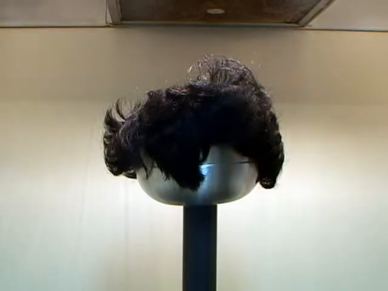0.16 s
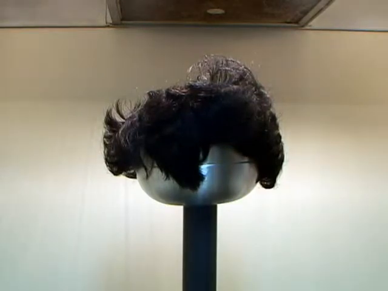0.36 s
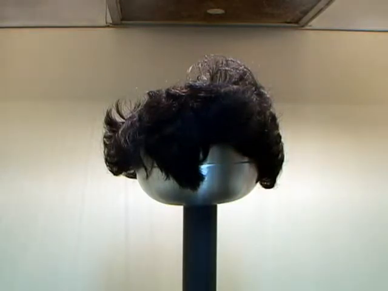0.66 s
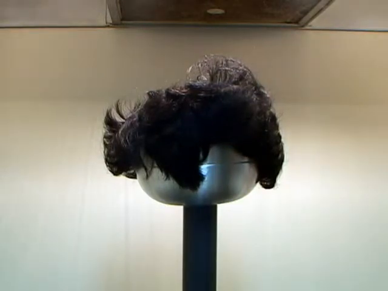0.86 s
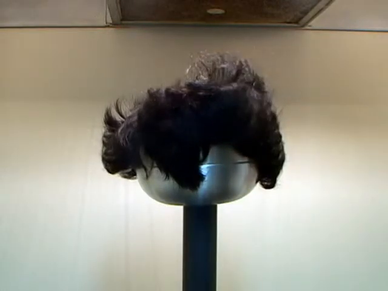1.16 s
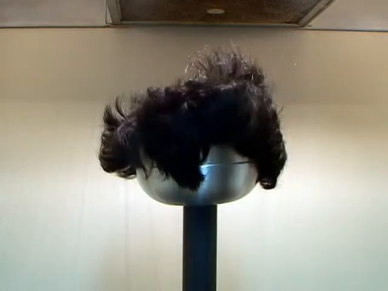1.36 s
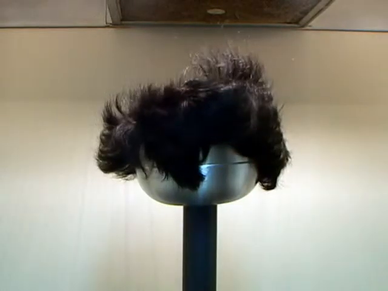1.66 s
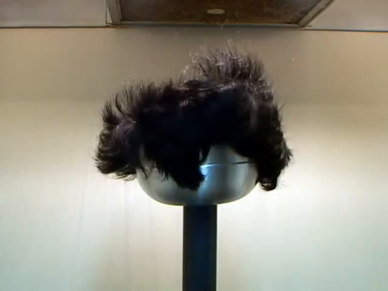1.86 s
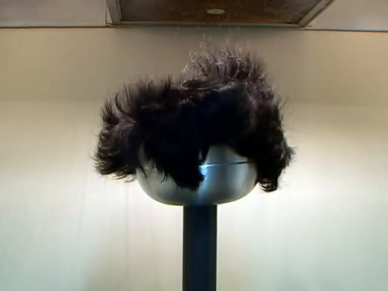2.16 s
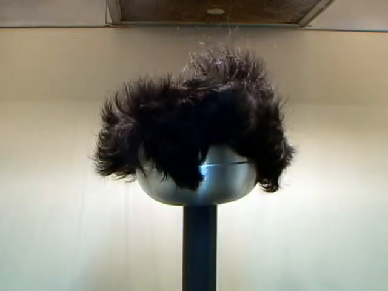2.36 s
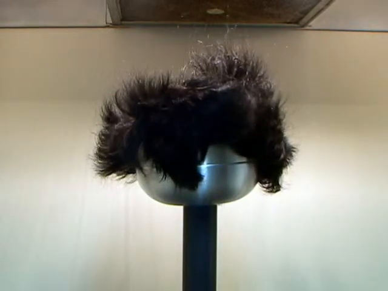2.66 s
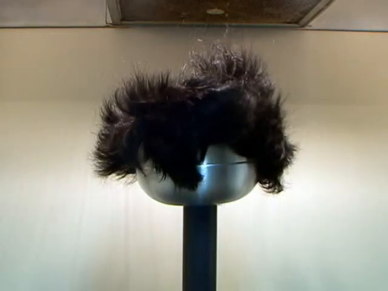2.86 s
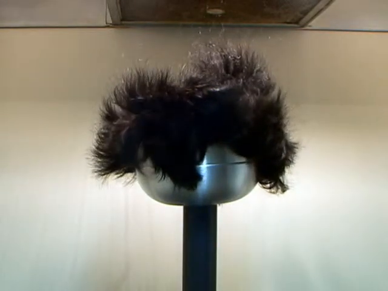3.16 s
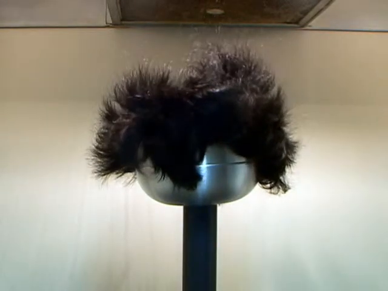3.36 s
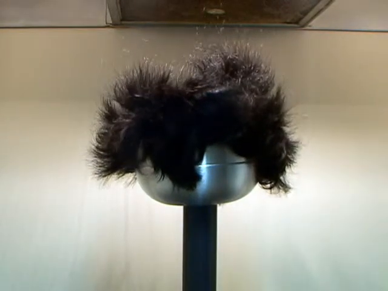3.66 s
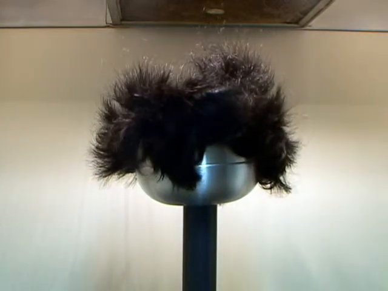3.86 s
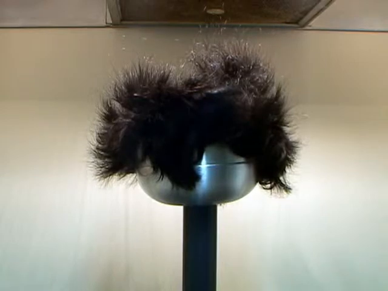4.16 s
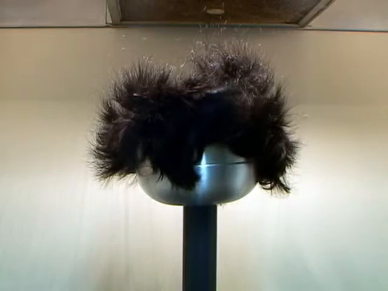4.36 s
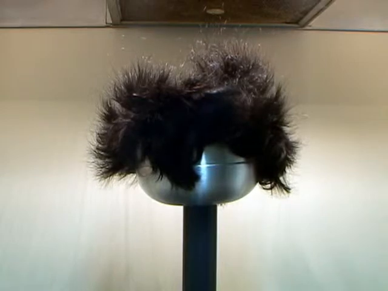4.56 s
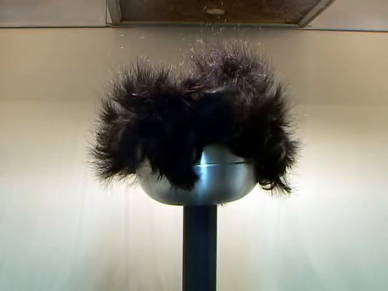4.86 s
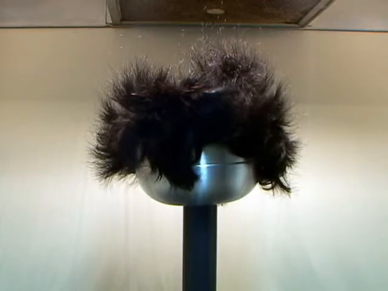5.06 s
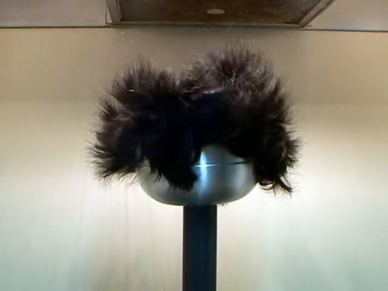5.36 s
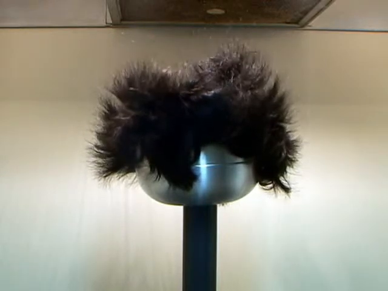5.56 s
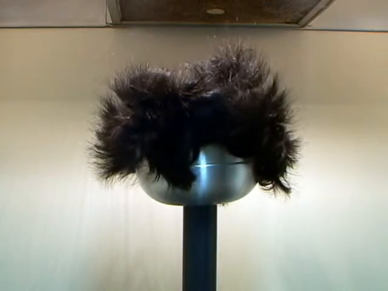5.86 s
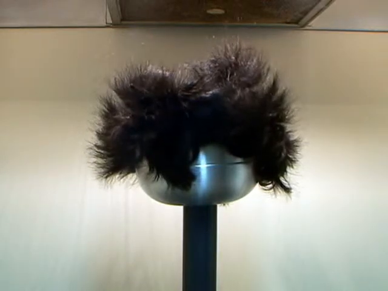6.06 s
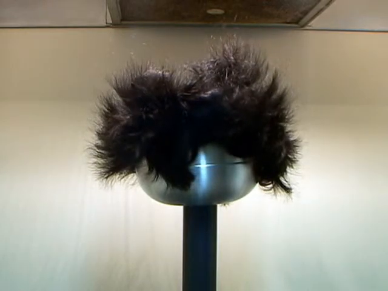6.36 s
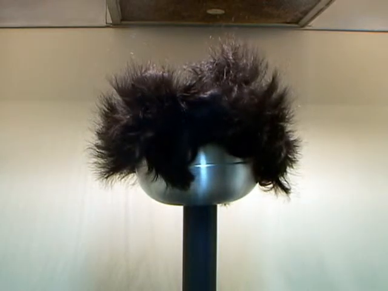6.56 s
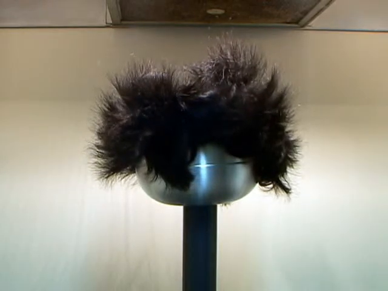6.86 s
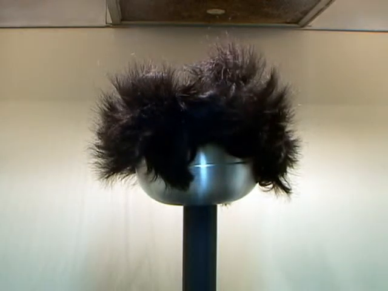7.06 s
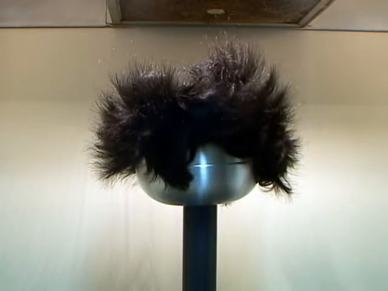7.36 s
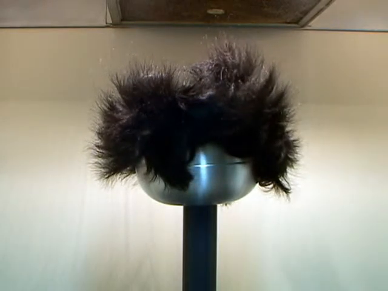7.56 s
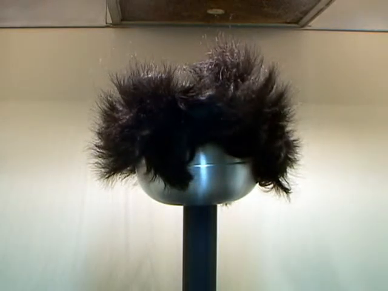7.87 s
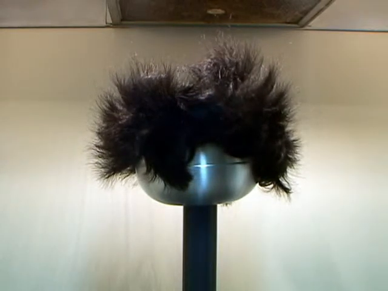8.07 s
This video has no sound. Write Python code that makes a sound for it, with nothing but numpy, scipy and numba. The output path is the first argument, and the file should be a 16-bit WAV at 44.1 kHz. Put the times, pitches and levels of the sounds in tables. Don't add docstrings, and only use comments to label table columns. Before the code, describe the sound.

A quiet, slightly hissy small room. A hand fumbles softly on a hollow base, then a switch snaps at about 0.7 seconds. A small electric motor knocks and spins up in a fraction of a second to a steady, nasal whine with buzzing brush rattle and a gentle belt pulsation. Later, faint high crackles from a charged metal dome join it. Close, plain microphone; the motor keeps running to the end.

```python
import sys
import numpy as np
from scipy import signal
from scipy.fft import rfft, irfft, next_fast_len
from scipy.io import wavfile
from numba import njit

SR = 44100
rng = np.random.default_rng(int(sys.argv[2]) if len(sys.argv) > 2 else 0)


def volts_from_db(level):
    exponent = np.asarray(level, float) / 20
    return 10 ** exponent


def transcribe(u):
    v = np.clip(np.atleast_2d(u).T, -1, 1)
    q = np.round(v * 32767).astype(np.int16)
    wavfile.write(sys.argv[1], SR, q)


N = 362943
T = np.arange(N) / SR
STEP = 64

# pitch_hz, level_db
ROOM_TONE = [(15, -37), (25, 2), (96, -8), (152, 3), (227, -5.5), (552, -11.5), (970, -18), (1750, -26),
             (1950, -25.5), (5280, -28), (15500, -30)]
ROOM_TONE_DB = -52
# pitch_hz, level_db
TAPE_WHINE = [(150.7, -57), (570.6, -73), (1798, -74), (2466, -80), (3295, -77), (3898, -80), (4797, -77),
              (5093, -78), (5394, -78), (5696, -77), (5992, -83), (6293, -80), (6595, -78)]
# pitch_hz, side_minus_centre_db
ROOM_WIDTH = [(60, -1), (110, -12), (200, -4), (380, -4), (700, -4), (1290, -6), (2380, -10), (4400, -7.5),
              (9500, -13.5), (15000, -32)]

# start_s, peak_db, bright_share_db
FUMBLE = [(0.026, -62, -14), (0.126, -43.5, -6), (0.145, -45, -18), (0.179, -47, -15), (0.237, -44.5, -25),
          (0.328, -55, -19.5), (0.357, -56, -15.5), (0.397, -46, -10), (0.447, -39, -20), (0.478, -50, -21),
          (0.517, -43.5, -16), (0.549, -49, -13), (0.601, -49, -18), (0.634, -44, -22)]
# pitch_hz, level_db, fade_60db_s
BASE_DULL = [(560, -2, 0.028), (700, 2, 0.023), (875, 2.5, 0.012), (1100, -3, 0.014), (1300, -2, 0.015),
             (1600, -2, 0.01)]
# pitch_hz, level_db, fade_60db_s
BASE_BRIGHT = [(2500, 1, .02), (2880, -1, 0.014), (3600, -5, .015)]
TOUCH_S = 0.035

# start_s, peak_db
PRESS = [
    (.668, -41),
    (.679, -39),
    (.686, -37),
    (.704, -30),
    (.718, -33),
]
# pitch_hz, level_db, fade_60db_s
PRESS_MODES = [(108, -7, 0.08), (194, -3.5, 0.11), (418, -3.5, 0.056), (682, -1.5, 0.057), (850, -5, 0.043),
               (1920, -4, 0.016)]

# start_s, peak_db
SWITCH = [
    (.7025, -34),
    (.7032, -31),
    (.7041, -33),
    (.7052, -36),
    (.709, -39),
    (.7185, -44),
]
# pitch_hz, level_db, fade_60db_s
SWITCH_MODES = [(1250, 0, .012), (1600, -7, .01), (2400, -12, .005), (3500, -2, .008), (4200, -11, .004),
                (5600, -14, .004), (8500, -18, .003)]
# low_hz, high_hz, level_db, decay_s
PUFFS = [
    (2800, 4200, -35, 0.0085),
    (4500, 12500, -51, 0.004),
]

# time_s, turns_per_s
SPIN_UP = [
    (.70, 14),
    (.75, 25),
    (.85, 42),
    (.90, 49),
    (.95, 53.8),
    (1.0, 55.4),
    (1.15, 55.6),
]
FULL_SPEED = 55.3
SETTLE_DROP, SETTLE_S = .35, 1.1
BELT_HZ, BELT_SWING, BELT_CREST_S = 5.787, .18, .0836
ROLLER_HZ, ROLLER_SWING, ROLLER_CREST_S = 9.46, .07, .0803
LOAD_POWER = 2.53
JOLT_S, JOLT_WIDTH_S, JOLT_DB = .73, .012, 8.9
HUM_HZ, HUM_DB = 120, -54.5

# order, centre_db, side_db, swell_with_speed (-1 to 1)
STRONG_ORDERS = [(1, -47, -66, 0), (3, -53, -79, 0), (5, -56, -71, 0), (7, -30, -59, 0), (10, -42, -57, .1),
                 (11, -49, -53, .2), (12, -44, -47, -.1), (13, -44, -58, .6), (14, -44, -52, .4),
                 (15, -49, -65, 0), (18, -46, -54, -.2), (21, -45, -46, .6), (22, -37, -50, -.1),
                 (23, -38, -59, -.1), (24, -41, -60, -.1), (26, -43, -60, .1), (27, -46, -50, .6),
                 (28, -31, -47, -.05), (29, -43, -51, -.2), (30, -43, -65, .7), (33, -42, -56, -.5),
                 (34, -42, -71, .2), (35, -46, -57, -.2), (36, -45, -50, -.5), (38, -46, -54, -.3),
                 (39, -48, -51, .2), (40, -44, -55, -.2), (42, -50, -50, -.5), (20, -61, -62, .2),
                 (19, -50, -69, -.2)]
TOP_ORDER = 72
# pitch_hz, level_db
WEAK_CENTRE = [(110, -73), (220, -77), (340, -62), (440, -57.5), (1400, -54.5), (2500, -53.5),
               (3100, -59.5), (4000, -63)]
# pitch_hz, level_db
WEAK_SIDE = [(110, -78), (220, -73), (330, -63), (1000, -67), (2300, -60), (2700, -66), (3300, -82),
             (4000, -86)]
WEAK_SCATTER_DB, WEAK_SWELL = 1.5, .25
EARLY_DB_PER_SWELL = 7.0
# pitch_hz, level_db
EARLY_PANELS = [(400, -1), (530, -5), (620, -1), (830, 3.5), (950, -2), (1250, 2), (1500, 1), (1550, -3.5),
                (1650, -0.5)]
SWELL_GAIN = 1.3
PUSH_ANGLE = .36
PANEL_S, PANEL_WIDTH_S, PANEL_LIFT_DB, PANEL_REST_DB = 3, 1.5, 12, -7.5
WOBBLE_HZ, WOBBLE_DEPTH, WOBBLE_CREST_S = 1.466, .75, 1.5
SHIVER_HZ, SHIVER_DEPTH, SHIVER_CREST_S, SHIVER_S, SHIVER_WIDTH_S = 1.85, 1.05, 1.35, 1.45, .24

# angle_turns, level_db
CONTACTS = [
    (.0, 3),
    (.10, -12.5),
    (.28, -6),
    (.38, 0),
    (.51, -13),
    (.66, -12.5),
    (.79, -30),
]
# pitch_hz, level_db per Hz
RATTLE_COLOUR = [(60, -89), (200, -86), (330, -76.5), (470, -75), (950, -77.5), (1250, -72), (1600, -65.5),
                 (2100, -67.5), (2600, -73), (3100, -82.5), (5500, -82.5), (9500, -89), (12200, -98),
                 (13200, -110)]
# pitch_hz, width_hz, level_db
RATTLE_RINGS = [(3415, 47, 4.5), (3540, 67, 8), (4540, 400, -4), (5890, 210, -2.5), (7050, 440, 3),
                (7700, 350, 2), (8400, 83, 2), (9180, 130, 8), (9870, 130, 5.5)]

# pitch_hz, level_db, fade_60db_s
KNOCK_MODES = [(384, -15, 0.058), (777, -5, 0.047), (1260, -6, 0.04), (1537, 0, 0.034), (1980, -0.5, 0.026),
               (2250, -3, 0.017), (2820, -0.5, 0.0048)]
KNOCK_ANGLE, KNOCK_UNTIL_S = .76, .935
KNOCK_DB, KNOCK_GROWS_DB_PER_S, KNOCK_SPREAD_S = -28.5, 15, 0.00595
KNOCK_PUFF_DB = -14

# start_s, peak_db
SPARKS = [(3.811, -40), (5.4094, -36), (5.4468, -34), (5.5166, -37), (5.6787, -36), (5.7581, -30),
          (5.8548, -36), (5.9077, -32), (6.018, -35), (6.1512, -32), (6.4136, -34), (6.5263, -35),
          (6.687, -37), (6.7478, -36), (6.877, -39), (7.0182, -33), (7.0771, -40), (7.1334, -40),
          (7.1963, -36), (7.4632, -36), (7.767, -31), (7.9172, -39), (7.9451, -37), (8.1167, -34.5),
          (8.1736, -35), (8.206, -40)]
# time_s, rate_per_s
CORONA = [
    (1, 5.5),
    (5.2, 18),
    (5.5, 53),
    (8.23, 60),
]

SCAN_HZ, SCAN_DB = 15734, -81
# pitch_hz, level_db
BAND_LIMIT = [(15760, 0), (15800, -80)]


def at_hz(points, hz):
    table_hz, values = np.transpose(points)
    return np.interp(np.log(hz + 1), np.log(table_hz), values)


def colour(x, *spectra):
    size = next_fast_len(N)
    hz = np.arange(size // 2 + 1) * SR / size
    gain = volts_from_db(sum(at_hz(s, hz) for s in spectra))
    return irfft(rfft(x, size) * gain, size)[..., :N]


def band(x, low_hz, high_hz):
    return signal.sosfilt(signal.butter(2, [low_hz, high_hz], "band", fs=SR, output="sos"), x)


def fade(clicks, decay_s):
    return signal.lfilter([1], [1, -np.exp(-1 / (decay_s * SR))], clicks)


def drift(rate_hz, count):
    r = np.exp(-2 * np.pi * rate_hz * STEP / SR)
    chance = rng.standard_normal((count, N // STEP + 502))
    slow = signal.lfilter([1], [1, -2 * r, r * r], chance)[:, 500:]
    return slow / slow.std(axis=1, keepdims=True)


def tones(lines):
    out = np.zeros(N)
    for hz, level_db in lines:
        out += np.sqrt(2) * volts_from_db(level_db) * np.sin(2 * np.pi * (hz * T + rng.random()))
    return out


def strike(events, modes, spread_db):
    at = [round(row[0] * SR) for row in events]
    peak_db = np.array(events)[:, 1]
    luck = rng.standard_normal((len(at), len(modes)))
    out = np.zeros(N)
    for (hz, level_db, t60), own in zip(modes, luck.T):
        clicks = np.full(N, 1e-18)
        clicks[at] = volts_from_db(peak_db + level_db + spread_db * own)
        r = volts_from_db(-60 / (t60 * SR))
        w = 2 * np.pi * hz / SR
        out += signal.lfilter([0, np.sin(w)], [1, -2 * r * np.cos(w), r * r], clicks)
    return out


def room(x, t60, wet_db, side_db):
    age = np.arange(SR // 2) / SR
    tails = rng.standard_normal((2, len(age))) * volts_from_db(-60 * age / t60) * (age > .003)
    tails /= np.linalg.norm(tails[0])
    centre, side = signal.fftconvolve(x[None], tails, axes=1)[:, :N]
    return np.array([x + volts_from_db(wet_db) * centre, volts_from_db(side_db) * colour(side, ROOM_WIDTH)])


def room_tone():
    centre, side = colour(rng.standard_normal((2, N)), ROOM_TONE)
    side = colour(side, [(100, -16), (1000, -0.5), (12000, -4.5)])
    hiss = volts_from_db(ROOM_TONE_DB) * np.array([centre, side]) / centre.std()
    return hiss + tones(TAPE_WHINE) * volts_from_db([[0], [-12]])


def fumble():
    slips = rng.random((len(FUMBLE), 16, 2))
    dull, bright = [], []
    for (start_s, peak_db, bright_db), row in zip(FUMBLE, slips):
        for late, weak in row:
            s = start_s + TOUCH_S * late ** 1.5
            level_db = peak_db - 10.5 - 10 * weak
            dull.append((s, level_db))
            bright.append((s, level_db + bright_db))
    return strike(dull, BASE_DULL, spread_db=3.0) + strike(bright, BASE_BRIGHT, spread_db=8.5)


def press():
    return volts_from_db(-1.5) * strike(PRESS, PRESS_MODES, spread_db=3.5)


def shaft():
    time_s, table_speed = np.transpose(SPIN_UP)
    lap = np.cos(2 * np.pi * BELT_HZ * (T - BELT_CREST_S))
    roll = np.cos(2 * np.pi * ROLLER_HZ * (T - ROLLER_CREST_S))
    step_s = np.arange(N // STEP + 2) * STEP / SR
    wander = np.interp(T, step_s, .04 * drift(6.0, count=1)[0])
    drag = SETTLE_DROP * (1 - np.exp(-np.maximum(T - time_s[-1], 0) / SETTLE_S))
    mean = np.interp(T, time_s, table_speed) - drag
    speed = mean + BELT_SWING * lap + ROLLER_SWING * roll + wander
    jolt = volts_from_db(JOLT_DB * np.exp(-((T - JOLT_S) / JOLT_WIDTH_S) ** 2))
    load = (mean / FULL_SPEED) ** LOAD_POWER * jolt * (T > time_s[0])
    return speed, np.cumsum(speed) / SR, load, lap


def mains_hum():
    return (T > SPIN_UP[0][0]) * tones([(HUM_HZ, HUM_DB)]) * volts_from_db([[0], [-16]])


def housing():
    order = np.arange(1, TOP_ORDER + 1)
    centre_luck, side_luck, swell_luck = rng.standard_normal((3, TOP_ORDER))
    centre_db = at_hz(WEAK_CENTRE, order * FULL_SPEED) + WEAK_SCATTER_DB * centre_luck
    side_db = at_hz(WEAK_SIDE, order * FULL_SPEED) + WEAK_SCATTER_DB * side_luck
    rows = np.array([centre_db, side_db, WEAK_SWELL * swell_luck * (order > 8)])
    for k, *row in STRONG_ORDERS:
        rows[:, k - 1] = row
    return order, *rows


@njit
def add_orders(out, spin, gains, step):
    for i in range(len(spin)):
        j, share, z = i // step, (i % step) / step, spin[i]
        for k in range(gains.shape[2]):
            for c in range(2):
                gain = gains[c, j, k] * (1 - share) + gains[c, j + 1, k] * share
                out[c, i] += (z * gain).real
            z *= spin[i]


def order_flutter(order, lap, pick, flutter=.025, flutter_rise=.0034):
    chance = drift(11.0, count=4 * len(order)).reshape(2, 2, len(order), -1)
    shake = np.swapaxes(chance[0] + 1j * chance[1], 1, 2) * (flutter + flutter_rise * order)
    shake[0, :, order == 7] *= .25
    shake[0, :, order == 28] *= .5
    early = np.exp(-np.maximum(T[pick] - 1.5, 0) / 1.2)
    dip = np.clip(.36 + .2 * drift(2.5, count=1)[0] + .45 * early, 0, .8)
    shake[0, :, 27] += .07 - np.maximum(lap[pick], 0) ** 4 * dip
    shake[1] *= 2.6
    return shake


def whine(speed, turns, lap):
    order, centre_db, side_db, swell = housing()
    pick = np.minimum(np.arange(N // STEP + 2) * STEP, N - 1)
    now = T[pick, None]
    reached = order * np.minimum(speed[pick, None] / FULL_SPEED * 1.02, 1)
    shake = order_flutter(order, lap, pick)

    smear = np.where(order < 36, .11 * order, 1.2) * rng.standard_normal(len(order))
    phase = np.exp(1j * np.cumsum(smear - 2 * np.pi * PUSH_ANGLE))
    across = 1j * rng.choice([-1, 1], len(order))

    settling = np.exp(-np.maximum(now - 1.3, 0) / 1.0)
    early_db = EARLY_DB_PER_SWELL * swell + at_hz(EARLY_PANELS, order * FULL_SPEED)
    lap_swell = SWELL_GAIN * swell * lap[pick, None] * (1 - 0.43 * settling)
    panel_db = PANEL_REST_DB + PANEL_LIFT_DB * np.exp(-((now - PANEL_S) / PANEL_WIDTH_S) ** 4)
    life = volts_from_db((order == 5) * panel_db) * (volts_from_db(early_db * settling) + lap_swell + shake)
    life[:, :, 14] *= 1 + WOBBLE_DEPTH * np.cos(2 * np.pi * WOBBLE_HZ * (T[pick] - WOBBLE_CREST_S))
    beat = 2j * np.pi * SHIVER_HZ * (now - SHIVER_CREST_S)
    life[:, :, 10:12] += SHIVER_DEPTH * np.exp(beat - ((now - SHIVER_S) / SHIVER_WIDTH_S) ** 4)

    centre = volts_from_db(np.interp(reached, order, centre_db))
    side = across * volts_from_db(np.interp(reached, order, side_db))
    gains = np.sqrt(2) * np.array([centre, side]) * life * phase
    out = np.zeros((2, N))
    add_orders(out, np.exp(2j * np.pi * turns), gains, STEP)
    return out


def rattle(turns, lap, steady=0.92, tick_s=.0017, luck_db=-2.0, ring_db=-3.5):
    ticks = np.zeros(N)
    for angle, level_db in CONTACTS:
        at = np.flatnonzero(np.diff(np.floor(turns - angle)))
        ticks[at] = volts_from_db(level_db + luck_db * rng.standard_normal(len(at)))
    gate = steady + fade(ticks, tick_s) * (1 + 0.026 * lap)
    noise = gate * rng.standard_normal(N)
    noise = colour(noise / noise.std() * np.sqrt(SR / 2), RATTLE_COLOUR)
    out = noise.copy()
    for hz, width_hz, level_db in RATTLE_RINGS:
        r = np.exp(-np.pi * width_hz / SR)
        top = np.array([1, 0, -1]) * (1 - r * r) / 2
        bottom = [1, -2 * r * np.cos(2 * np.pi * hz / SR), r * r]
        out += volts_from_db(ring_db + level_db) * signal.lfilter(top, bottom, noise)
    return out


def crack(times):
    clicks = np.full(N, 1e-18)
    clicks[(np.asarray(times) * SR).astype(int)] = 1
    out = np.zeros(N)
    for low_hz, high_hz, level_db, decay_s in PUFFS:
        burst = fade(clicks, decay_s) * rng.standard_normal(N)
        out += volts_from_db(level_db + 11) * band(burst, low_hz, high_hz)
    return out


def switch():
    return crack([SWITCH[0][0]]) + volts_from_db(-3) * strike(SWITCH, SWITCH_MODES, spread_db=1.5)


def knocks(turns):
    at = np.flatnonzero(np.diff(np.floor(turns - KNOCK_ANGLE))) / SR
    at = at[(at > JOLT_S) & (at < KNOCK_UNTIL_S)]
    hits = []
    for s, row in zip(at, rng.random((len(at), 4))):
        level_db = KNOCK_DB + KNOCK_GROWS_DB_PER_S * (s - JOLT_S)
        hits += [(s + KNOCK_SPREAD_S * (late - .3), level_db) for late in row]
    body = band(strike(hits, KNOCK_MODES, spread_db=5.0), 180, 2550) * volts_from_db(-7.5)
    return body + volts_from_db(KNOCK_PUFF_DB) * crack(at)


def crackle(burst_s=.0022):
    faint = rng.random(N) < np.interp(T, *np.transpose(CORONA), left=0) / SR
    clicks = faint * volts_from_db(-54 + 3.5 * rng.exponential(1, N).clip(0, 4))
    for s, peak_db in SPARKS:
        clicks[round(s * SR)] = volts_from_db(peak_db + 3.5)
    bursts = fade(clicks, burst_s) * rng.standard_normal(N)
    return band(bursts, 8400, 11900) + volts_from_db(-17) * band(bursts, 12000, 16000)


def scene():
    speed, turns, load, lap = shaft()
    orders = load * whine(speed, turns, lap)
    hits = band(press() + switch() + knocks(turns), 100, 12000)
    near = fumble() + hits + load ** 0.86 * rattle(turns, lap) + crackle()
    in_room = room(near, t60=0.2, wet_db=-3.5, side_db=-1)
    centre, side = room_tone() + in_room + mains_hum() + orders
    return np.array([volts_from_db(-0.28) * (centre + side), volts_from_db(-0.15) * (centre - side)])


def roll_off(x):
    return signal.sosfilt(signal.butter(12, 16290, fs=SR, output="sos"), x)


def record(dry):
    mix = colour(dry + tones([(SCAN_HZ, SCAN_DB)]), BAND_LIMIT)
    return roll_off(mix)


dry = scene()
out = record(dry)
transcribe(out)
```